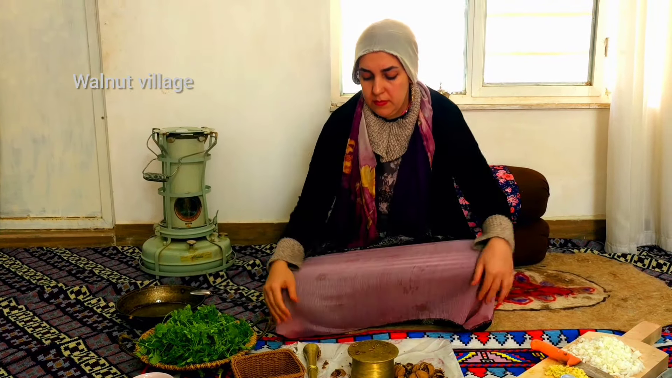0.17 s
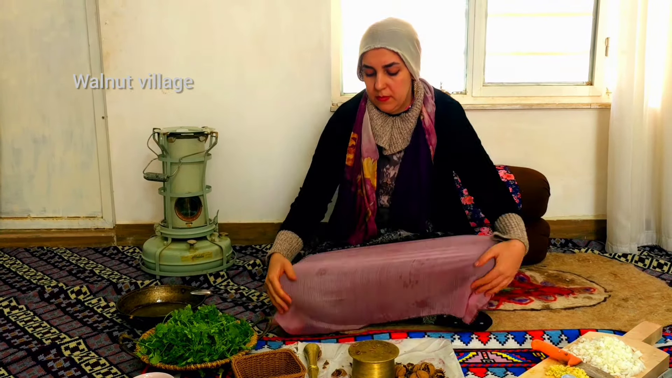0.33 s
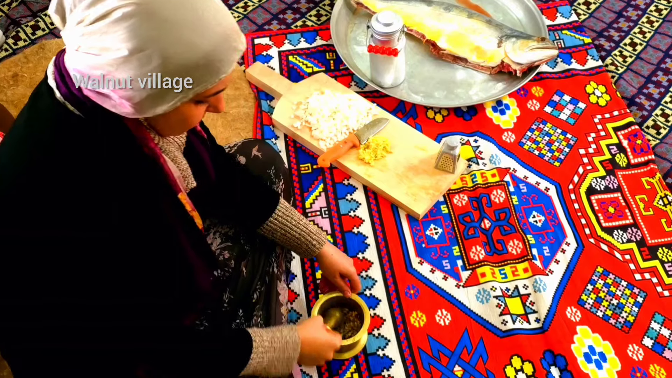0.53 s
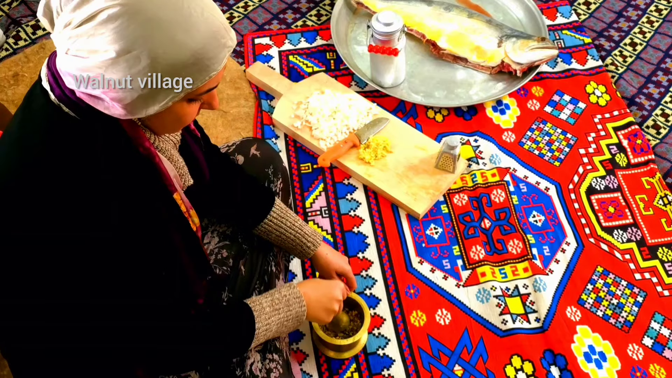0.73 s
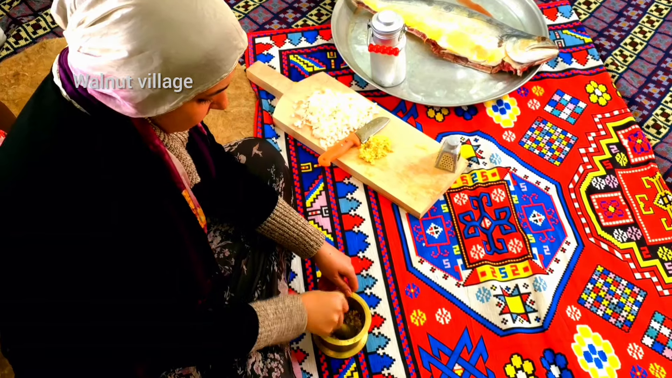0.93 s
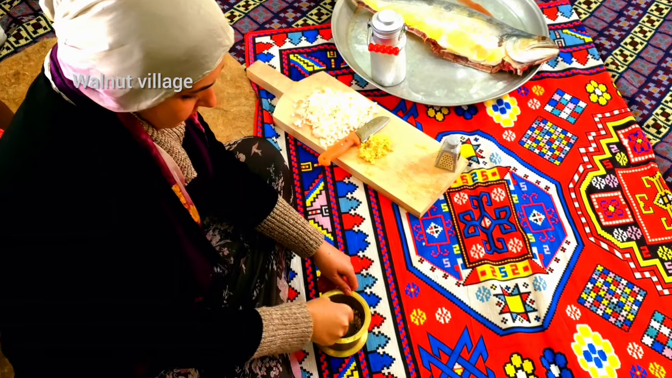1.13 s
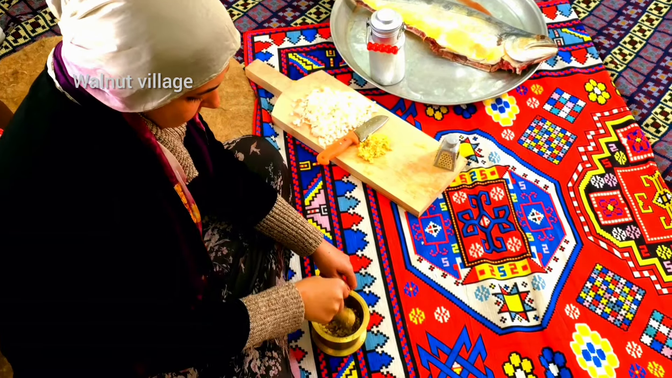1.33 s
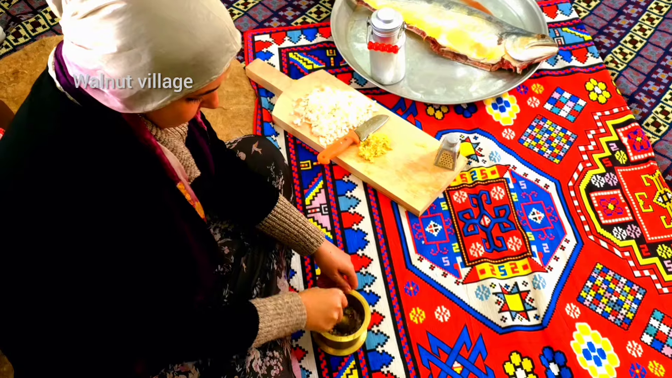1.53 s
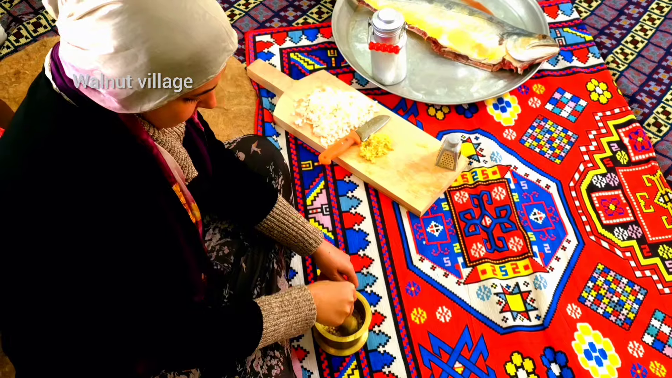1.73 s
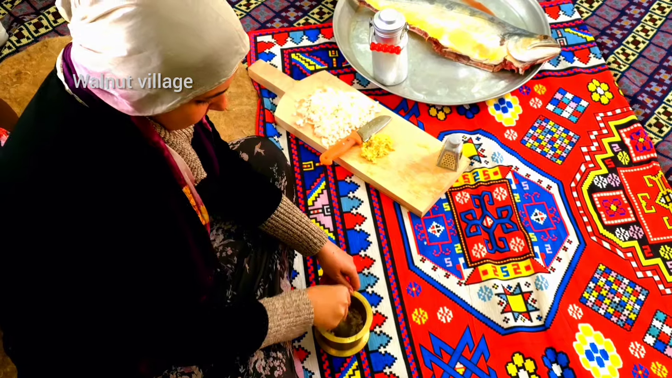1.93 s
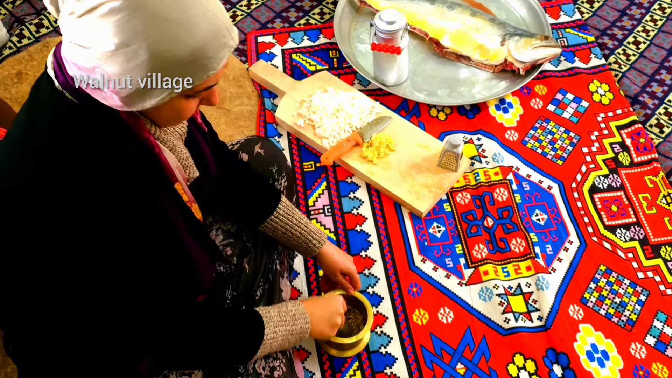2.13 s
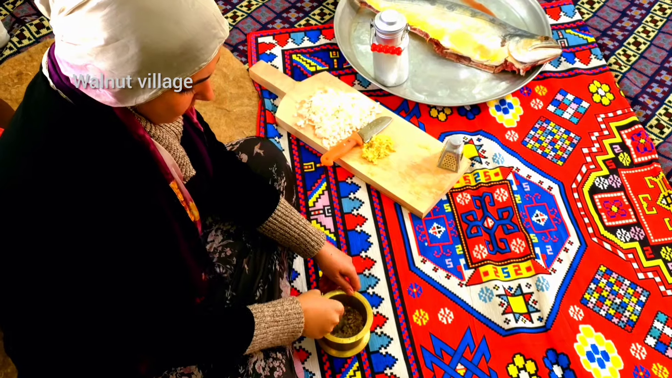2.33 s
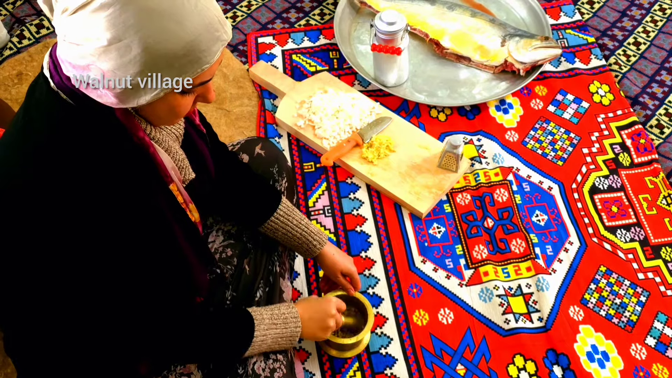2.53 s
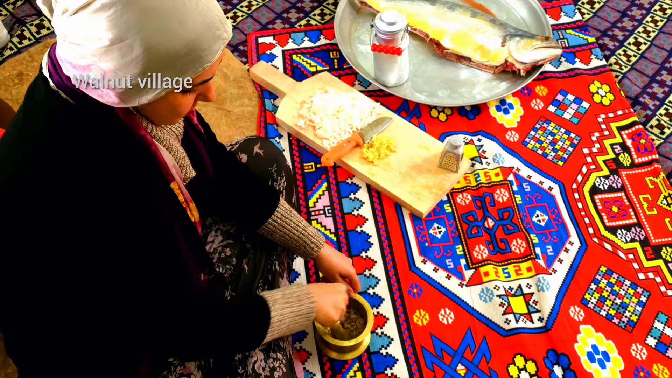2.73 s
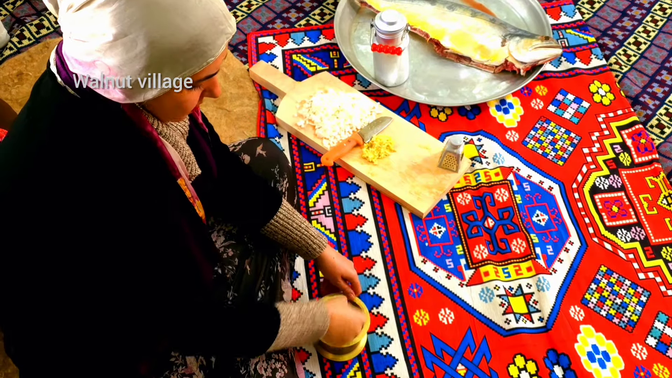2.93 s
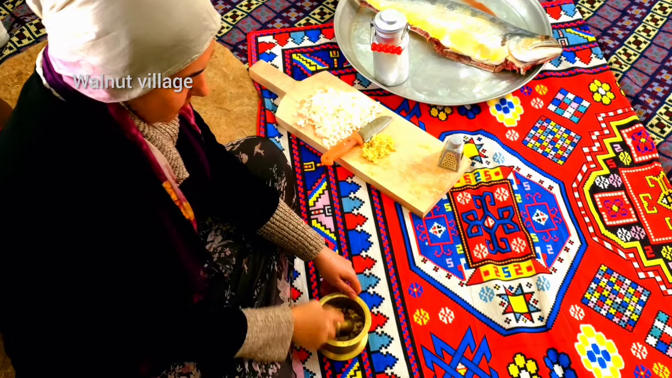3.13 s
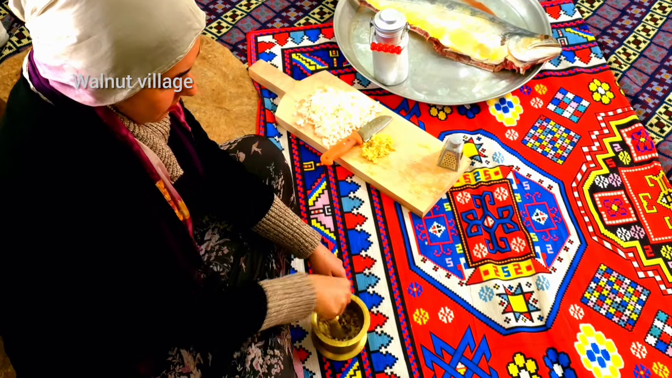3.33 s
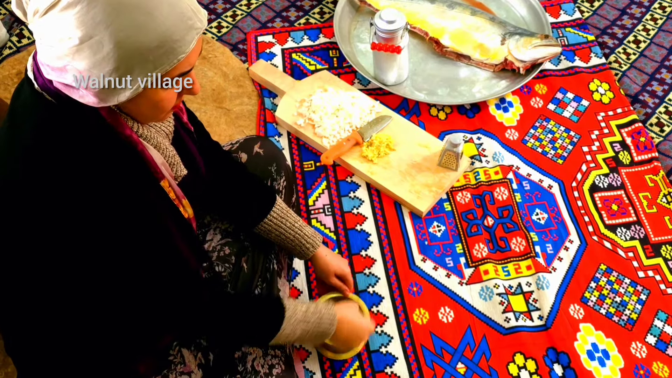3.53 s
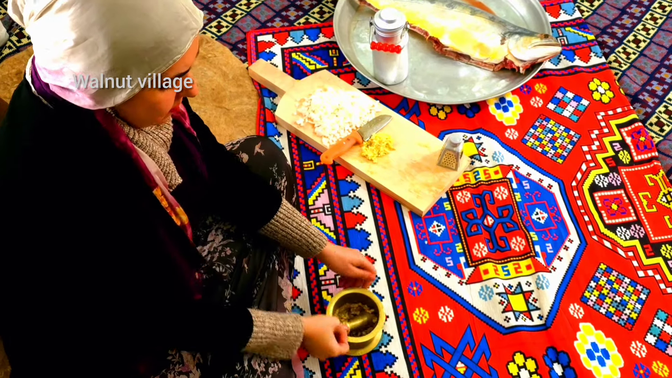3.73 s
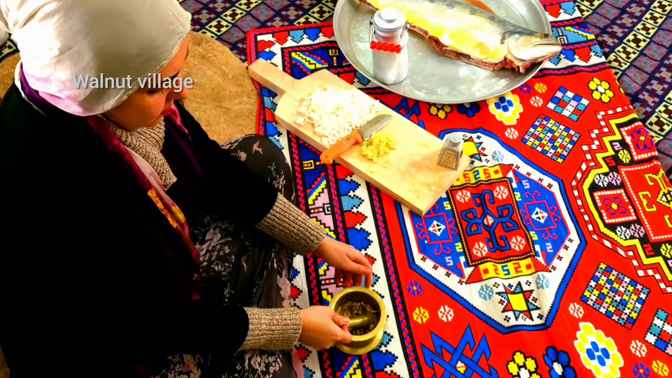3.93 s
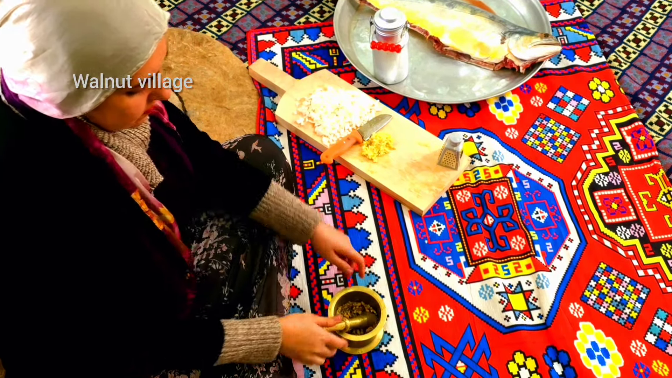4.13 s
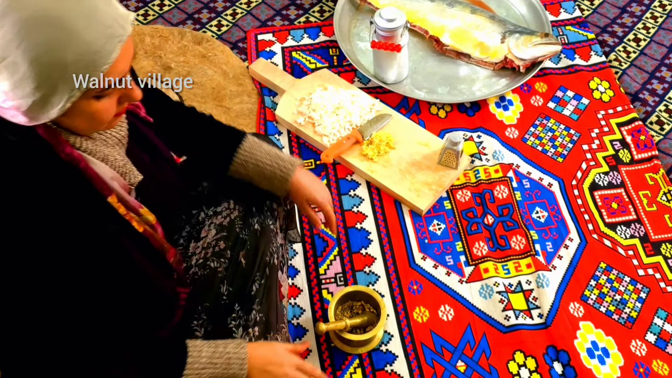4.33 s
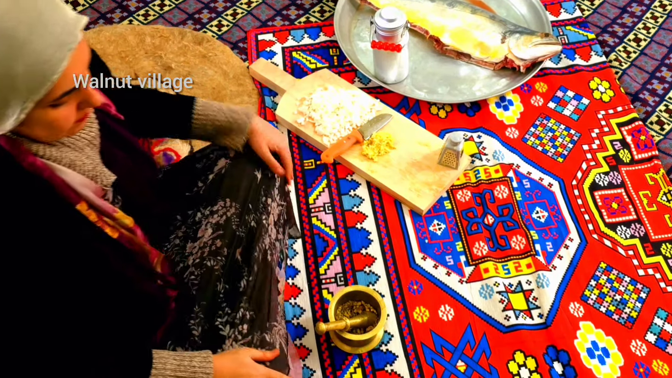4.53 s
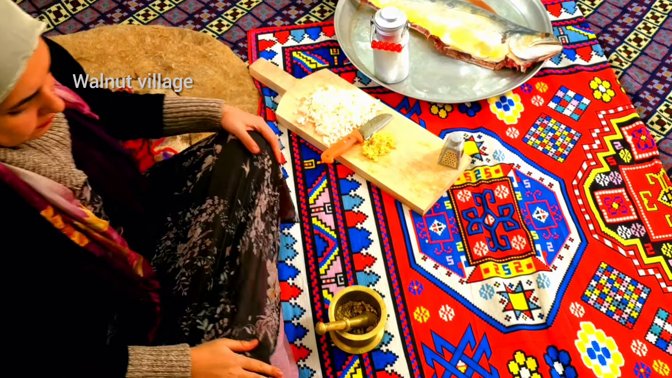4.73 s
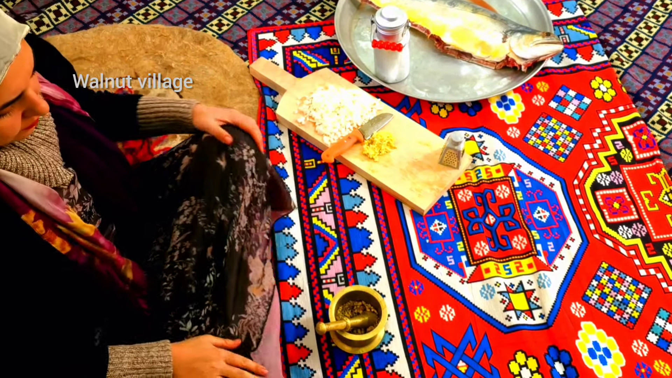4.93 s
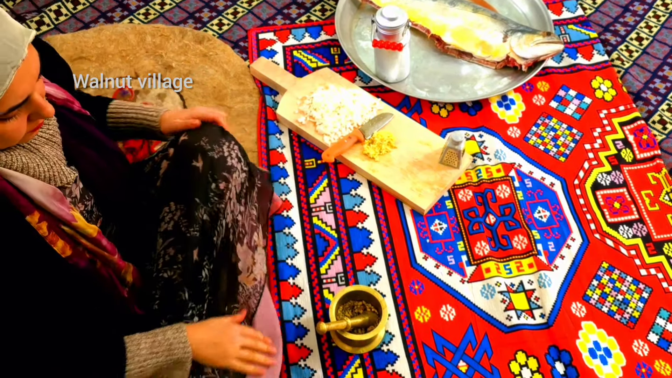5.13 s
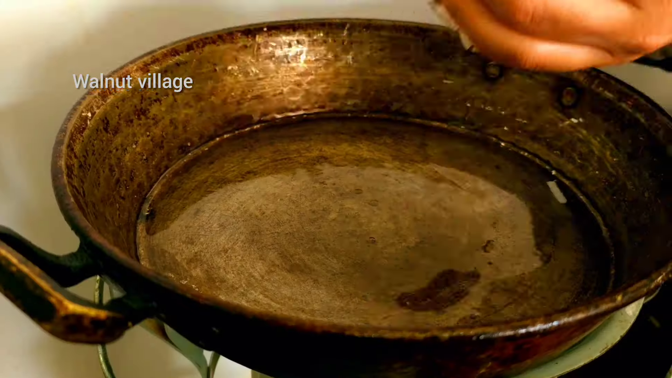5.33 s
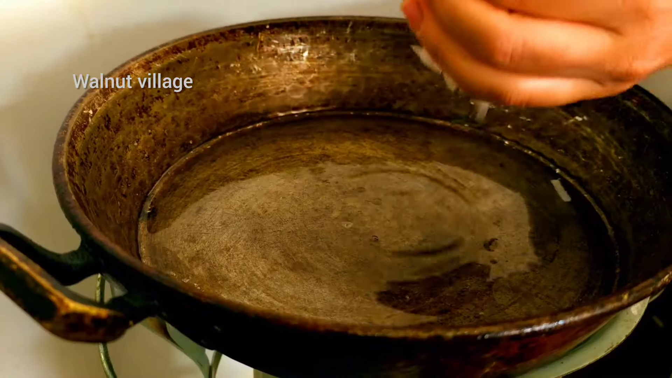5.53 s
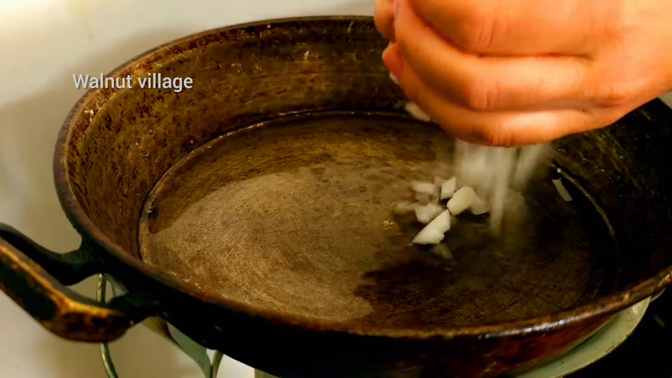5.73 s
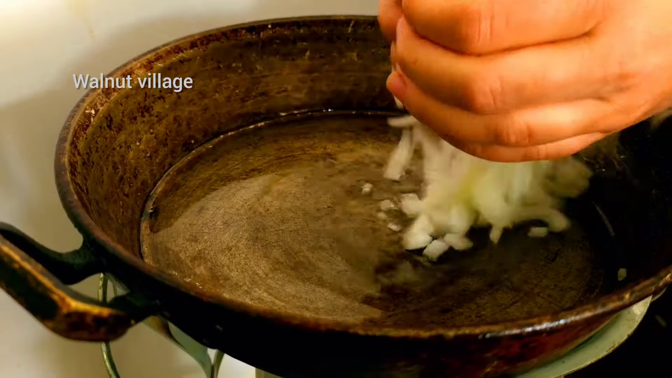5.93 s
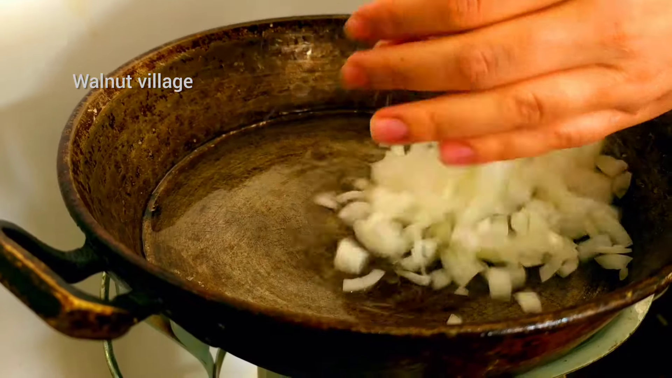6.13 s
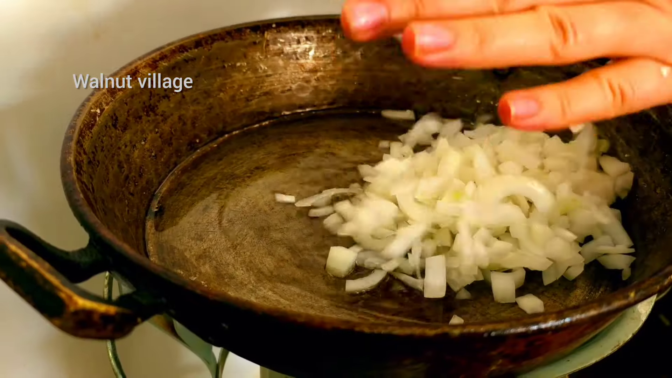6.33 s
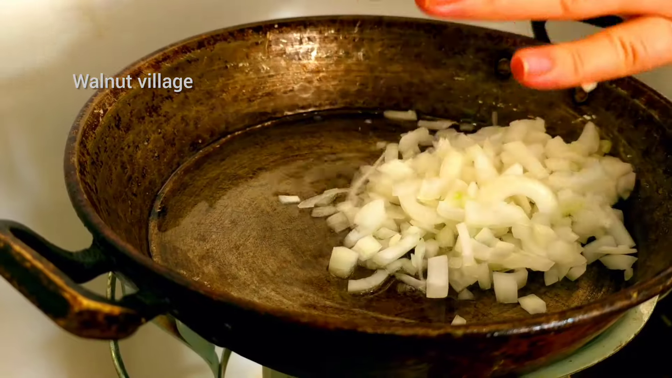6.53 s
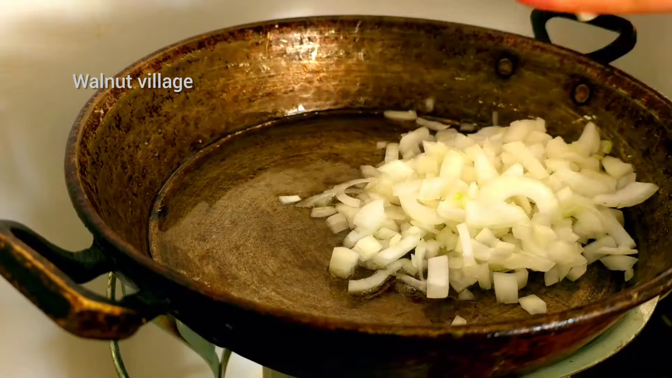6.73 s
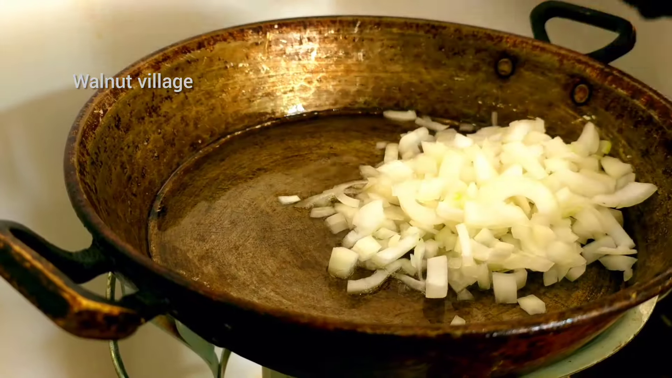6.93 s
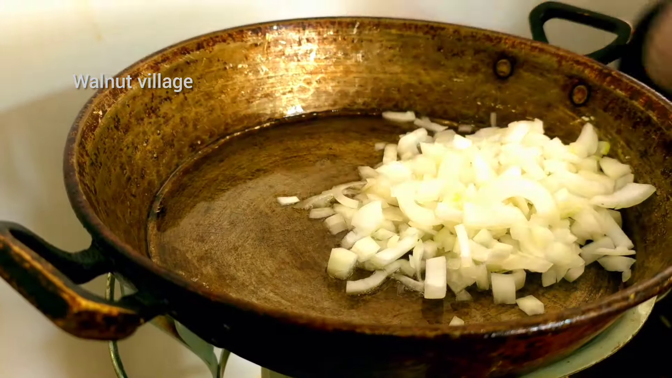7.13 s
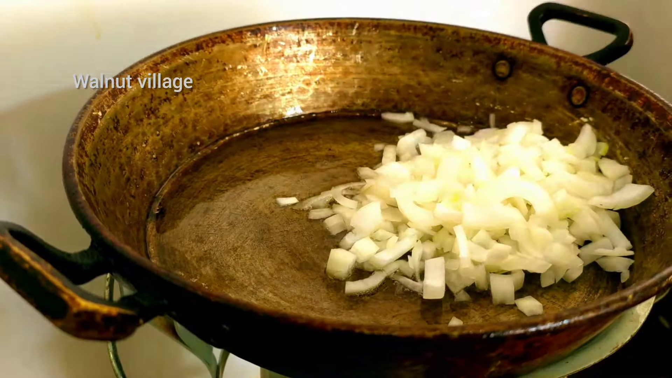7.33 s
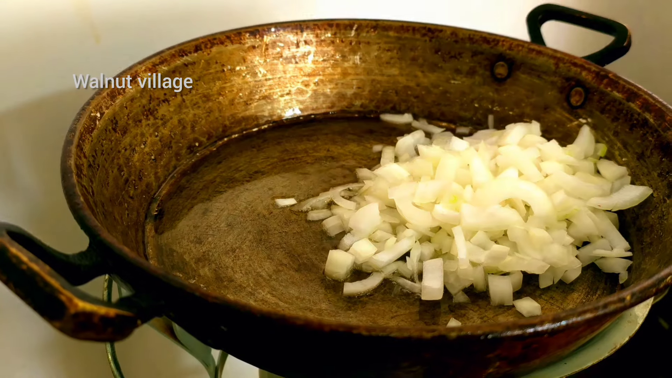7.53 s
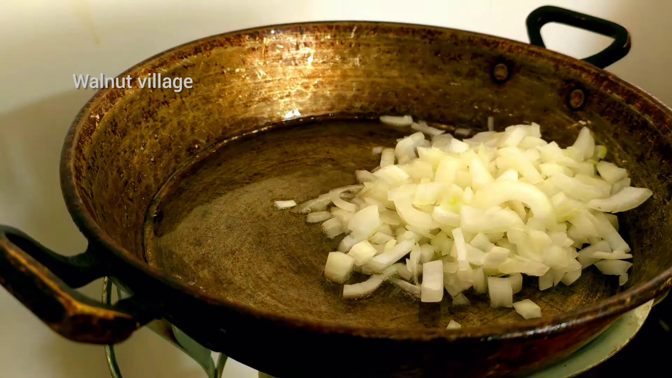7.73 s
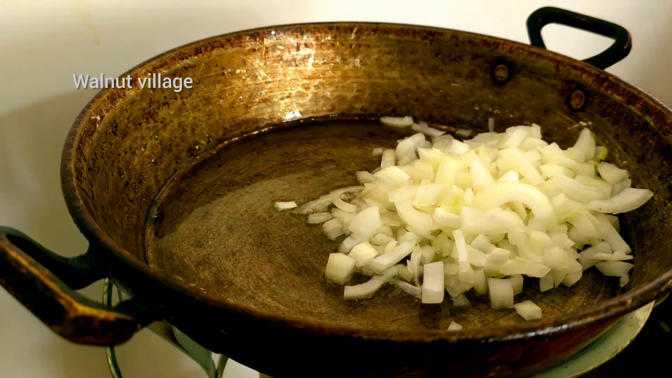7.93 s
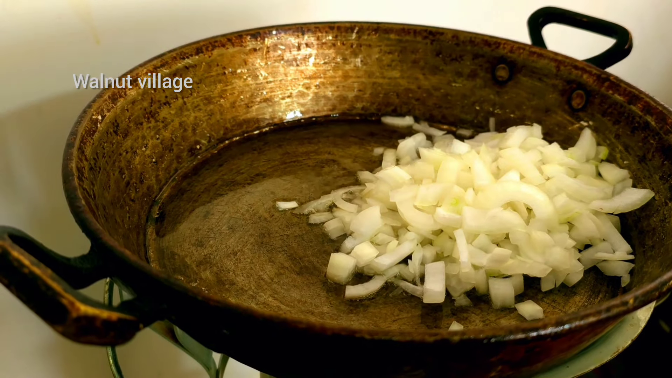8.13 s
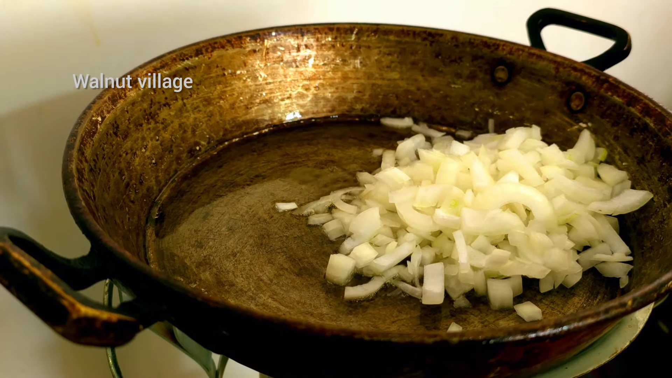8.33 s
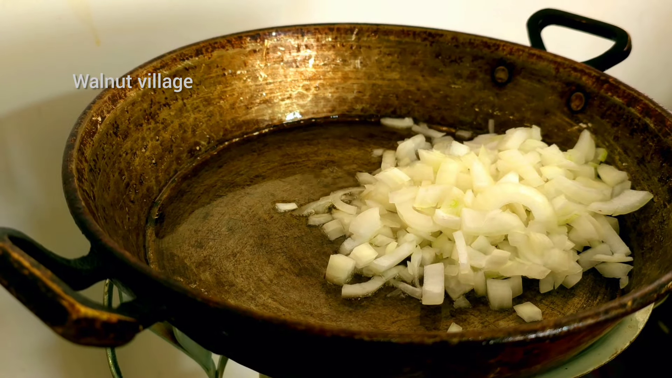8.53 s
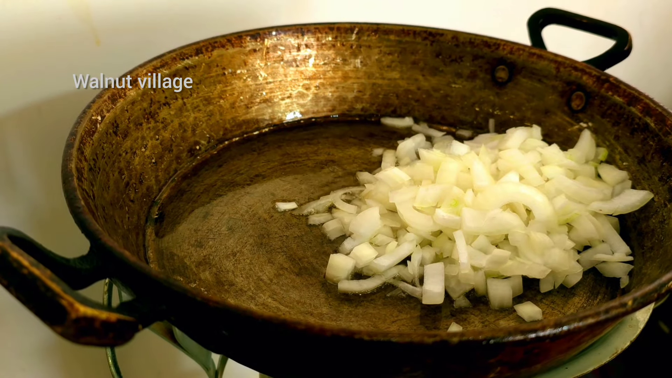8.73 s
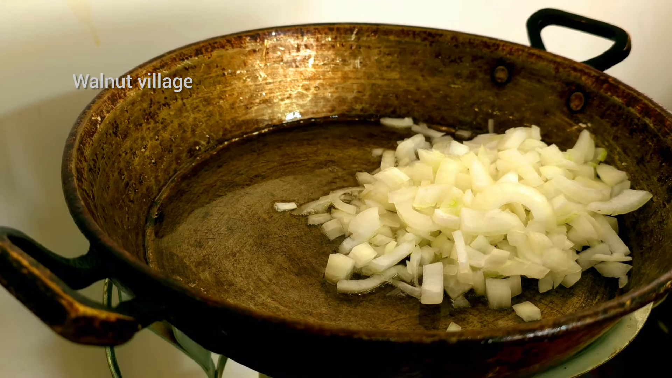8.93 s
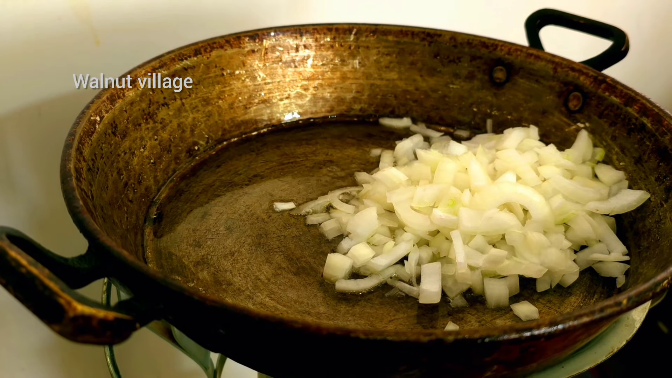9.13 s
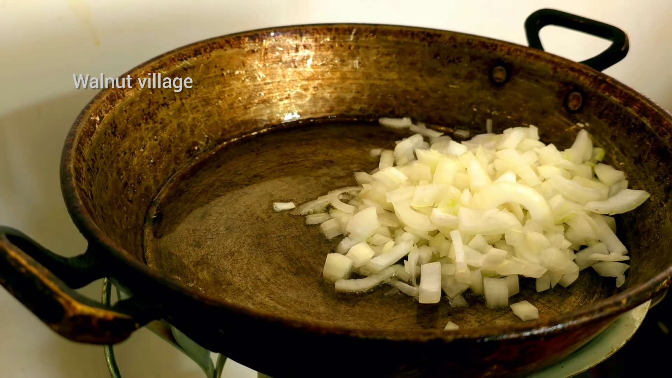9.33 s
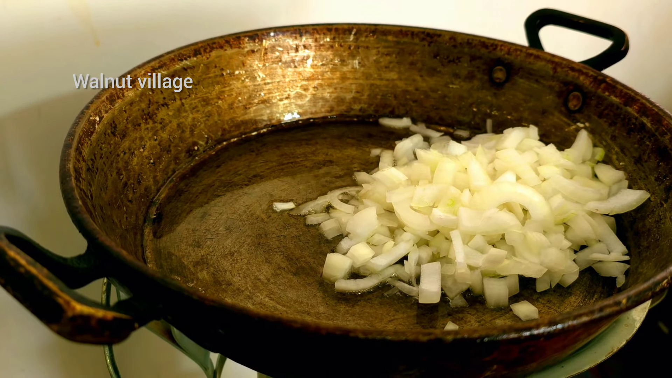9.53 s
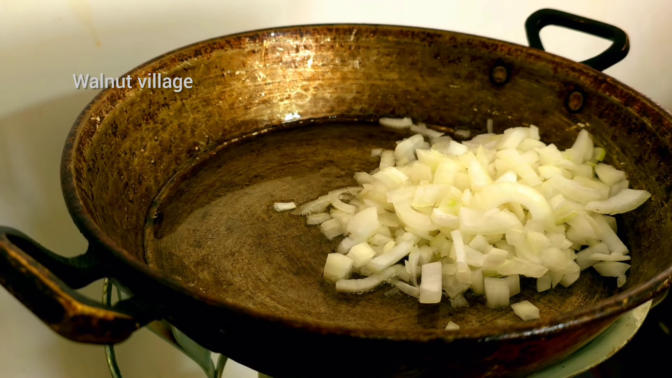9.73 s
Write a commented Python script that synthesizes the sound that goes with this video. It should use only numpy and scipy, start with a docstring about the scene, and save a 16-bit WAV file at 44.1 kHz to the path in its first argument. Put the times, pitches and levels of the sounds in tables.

```python
"""Garlic in a mortar, then onion in hot oil

In a quiet living room a brass pestle clinks on a mortar's wall, thuds into garlic and is laid down.
The brass rings as decaying, beating modes; each pound is a crunch of clicks over a booming floor.
In a kitchen a heavy pan clanks on a gas ring and chopped onion drops into hot oil. Random clicks
through filters patter, spit and settle to an even sizzle; gliding sines squeal.
Filtered noise makes the room air, the clothes, the flame and the gusts."""
import sys
import numpy as np
from scipy import signal
from scipy.fft import rfft, irfft
from scipy.io import wavfile

SR = 44100
rng = np.random.default_rng(int(sys.argv[2]) if len(sys.argv) > 2 else 0)


def int16_out(signal):
    """Quantize to a 16-bit WAV file."""
    q = np.round(np.clip(np.atleast_2d(signal).T, -1, 1) * 32767)
    wavfile.write(sys.argv[1], SR, q.astype(np.int16))


N = 435246
T = np.arange(N) / SR
AGE = T[:SR]   # time since an onset
SIDES = np.array([[1], [-1]])   # left, right


def from_db(db):
    """Amplitude of a level in dB."""
    return 10 ** (np.asarray(db) / 20)


def add(track, s, sound):
    """Mix a sound into a track from time s on."""
    at = round(s * SR)
    track[..., at:at + sound.shape[-1]] += sound[..., :N - at]


def together(*levels):
    """Level of unrelated sounds heard at once: their powers add."""
    return np.sqrt(sum(level ** 2 for level in levels))


def rms_one(x):
    """Scale so that the middle of the channels has rms 1."""
    return x / np.sqrt(np.mean(np.atleast_2d(x).mean(0) ** 2) + 1e-20)


def colour(x, spectrum, size=8192):
    """Causal (minimum-phase) filter that follows (Hz, dB) points and falls away beyond them."""
    hz, db = np.transpose(spectrum)
    octave = np.log2(np.maximum(np.fft.rfftfreq(size, 1 / SR), 1))
    points = np.log2(hz)
    beyond = np.abs(octave - np.clip(octave, points[0], points[-1]))
    shape_db = np.interp(octave, points, db) - np.minimum(30 * beyond, 70)
    # folding the cepstrum gives minimum phase
    cepstrum = irfft(np.log(from_db(shape_db)))[:size // 2]
    cepstrum[1:] *= 2
    response = irfft(np.exp(rfft(cepstrum, size)))
    filtered = signal.oaconvolve(np.atleast_2d(x), response[None], axes=1)
    return filtered[:, :x.shape[-1]].reshape(x.shape)


def drift(rate, t=T):
    """Slow chance: normal knots, rate per second, joined by lines."""
    knots = rng.standard_normal(int(t[-1] * rate) + 2)
    return np.interp(t * rate, np.arange(len(knots)), knots)


def noise(spectrum, side_db):
    """Coloured stereo noise, rms 1 in the middle."""
    mid, side = rng.standard_normal((2, N))
    return rms_one(colour(mid + from_db(side_db) * side * SIDES, spectrum))


def swell(s, rise_s, fall_s):
    """A rounded rise to 1 at time s and a rounded fall."""
    width_s = np.where(T < s, rise_s, fall_s)
    return np.exp(-np.minimum(((T - s) / width_s) ** 2, 40))


def envelope(s, attack_s, hold_s, fall_db_per_s):
    """Rise from time s; from hold_s after s on, die away."""
    fall_db = np.clip(fall_db_per_s * (T - s - hold_s), 0, 200)
    return np.clip((T - s) / attack_s, 0, 1) * from_db(-fall_db)


def mode(hz, t60, phase=0):
    """One decaying partial."""
    return np.sin(2 * np.pi * hz * AGE + phase) * from_db(-60 * AGE / t60)


def contact(t60, grit):
    """A click followed by a short gritty crush; energy 1."""
    burst = grit * rng.standard_normal(SR) * from_db(-60 * AGE / t60)
    burst[0] += 1
    return burst / np.linalg.norm(burst)


def rattle(length_s, per_s):
    """A first click and a run of smaller ones at uneven moments, 20 dB down after length_s; energy 1."""
    happens = rng.random(SR) < per_s / SR
    clicks = rng.standard_normal(SR) * happens * from_db(-20 * AGE / length_s)
    clicks[0] = 2
    return clicks / np.linalg.norm(clicks)


def grains(per_s, spread_db):
    """Clicks at random moments, mostly small and a few large."""
    sizes = from_db(spread_db * np.minimum(rng.exponential(1, N), 5)) * rng.choice([-1, 1], N)
    return sizes * (rng.random(N) < per_s / SR)


def crackle(per_s, spread_db, shared, spectrum):
    """Bursts all over the pan: some reach both sides alike, the rest mainly one."""
    both, left, right = [grains(per_s, spread_db) for _ in range(3)]
    return rms_one(colour(shared * both + np.array([left, right]), spectrum))


def plop(hz, cycles, rise):
    """A bubble rings for some cycles, its pitch rising as it surfaces."""
    turns = hz * AGE[:SR // 20]
    glide = 1 + rise * np.minimum(turns / cycles, 2) / 2
    return np.sin(2 * np.pi * turns * glide) * from_db(-60 * turns / cycles)


def room(x, wet_db, t60, lag=1):
    """Direct sound, right side late by lag samples, plus a tail alike in the bass and shorter in the treble."""
    mid, side = rng.standard_normal((2, SR))
    side_filter = signal.butter(1, 1100, "high", fs=SR, output="sos")
    white = mid + signal.sosfilt(side_filter, side) * SIDES
    low = signal.sosfilt(signal.butter(1, 2500, fs=SR, output="sos"), white)
    bass_tail = low * from_db(-60 * AGE / t60)
    treble_tail = (white - low) * from_db(-60 * AGE / (0.62 * t60))
    tail = (bass_tail + treble_tail) * (AGE > .002)
    tail /= np.linalg.norm(tail, axis=1, keepdims=True)
    left, right = np.broadcast_to(x, (2, N))
    direct = np.array([left, np.interp(np.arange(N) - lag, np.arange(N), right)])
    return direct + from_db(wet_db) * signal.oaconvolve(direct, tail, axes=1)[:, :N]


# living room air spectrum: f/Hz, level/dB
AIR_SPECTRUM = [(30, -19), (100, -11), (185, 1), (260, 0.5), (350, -6.5), (420, -4), (520, -15),
                (1000, -36)]
# cloth swish spectrum: f/Hz, level/dB
SWISH_SPECTRUM = [(600, -16), (1500, -1.5), (2200, 1), (3500, -10), (6000, -19.5)]
# fine cloth rustle spectrum: f/Hz, level/dB
RUSTLE_SPECTRUM = [(2000, -3.5), (4500, 4.5), (7200, 2), (10000, -6), (12500, 1), (15500, -4)]
# sleeve and skirt movements: t at the fastest/s, length/s, swish level/dB, rustle level/dB
CLOTH_MOVES = [(0.023, 0.24, -66.5, -100), (0.256, 0.38, -91, -72.5), (2.585, 1, -75, -74.5),
               (4.258, 0.27, -66.5, -84), (4.502, 0.3, -80, -69.5), (5.03, 0.44, -81.5, -67)]
AIR_DB, HUM_HZ, HUM_DB = -68, 410, -68
MOVE_RISE_SHARE = 0.27   # a movement starts faster than it ends
STILL_SWISH_DB, STILL_RUSTLE_DB = -84.5, -83   # faint hiss between movements


def living_room():
    """Steady noise for the air with a faint sine hum; cloth noise follows the speed of each movement."""
    swish, rustle = from_db(STILL_SWISH_DB), from_db(STILL_RUSTLE_DB)
    for s, length, swish_db, rustle_db in CLOTH_MOVES:
        speed = swell(s, MOVE_RISE_SHARE * length, length)
        swish = together(swish, from_db(swish_db) * speed)
        rustle = together(rustle, from_db(rustle_db) * speed)
    air = from_db(AIR_DB) * noise(AIR_SPECTRUM, side_db=-7.5)
    hum = from_db(HUM_DB) * np.sin(2 * np.pi * HUM_HZ * T)
    clothes = swish * noise(SWISH_SPECTRUM, side_db=-0.5) + rustle * noise(RUSTLE_SPECTRUM, side_db=0.5)
    return air + hum + clothes


# air buffeting spectrum: f/Hz, level/dB
BUFFET_SPECTRUM = [(14, 10), (22, 20.5), (29, 13), (38, 1), (50, 11), (70, -14)]
# flame flutter spectrum: f/Hz, level/dB
FLAME_SPECTRUM = [(40, -71), (70, 9), (105, 10), (135, -7), (200, -50)]
# burner drone spectrum: f/Hz, level/dB
BURNER_SPECTRUM = [(150, -40), (195, 1), (230, -16.5), (255, 12), (280, -1.5), (320, 1.5), (450, -8),
                   (700, -11.5)]
# air pushed at the microphone by the hand: t at the peak/s, level/dB
HAND_GUSTS = [(6.07, -67), (6.41, -31.5)]
# flutter of the gas flame: t/s, level/dB
FLAME_FLUTTER = [(7.0, -68.5), (7.59, -65.5), (7.82, -81), (7.97, -67), (8.21, -96), (8.63, -63),
                 (9.84, -76.5)]
GUST_ATTACK_S, GUST_FALL_DB_PER_S = 0.089, 66
GUST_FLUTTER_DB = -12.5   # higher flutter that comes with a gust, against the gust
LANDING_THUD_DB = -56.5   # low thud of the onion on the iron


def stove(landing):
    """Flame noise flutters over the burner's drone; onion thuds, and the withdrawing hand's air buffets."""
    flame_db = np.interp(T, *np.transpose(FLAME_FLUTTER))
    gust = 0
    for s, db in HAND_GUSTS:
        gust = gust + from_db(db) * envelope(s - GUST_ATTACK_S, GUST_ATTACK_S, GUST_ATTACK_S, GUST_FALL_DB_PER_S)
    flutter = together(from_db(flame_db), from_db(LANDING_THUD_DB) * landing,
                       from_db(GUST_FLUTTER_DB) * gust)
    buffeting = gust * noise(BUFFET_SPECTRUM, side_db=-13)
    flame = flutter * noise(FLAME_SPECTRUM, side_db=-10.0)
    return buffeting + flame + from_db(-66.0) * noise(BURNER_SPECTRUM, side_db=-7.0)


# small knocks of handling: t/s, level/dB, f/Hz
HANDLING_TAPS = [(4.478, -47, 444), (5.254, -44, 2460)]


def taps():
    """Dull little knocks: gritty contacts filtered around one pitch each."""
    out = np.zeros(N)
    for s, db, hz in HANDLING_TAPS:
        tap = colour(contact(t60=0.015, grit=0.48), [(hz / 2, -9), (hz, 0), (hz * 1.38, -8)])
        add(out, s, from_db(db) * tap / np.abs(tap).max())
    return room(out, wet_db=-4.0, t60=0.37)


# blows cushioned by garlic: t/s, relative crunch level/dB, relative floor thump level/dB
CUSHIONED_BLOWS = [(0.955, -48.5, -57.5), (1.448, -45.5, -38), (1.944, -47.5, -48.5)]
# crunch spectrum: f/Hz, level/dB
CRUNCH_SPECTRUM = [(200, 8.5), (700, -10), (1500, -12), (2300, -2.5), (3600, -2), (5500, -11.5),
                   (10000, -15), (16000, -12)]
# floorboard modes: f/Hz, relative level/dB, t60/s
FLOOR_MODES = [(62, -27.5, 0.83), (115, -7.5, 0.33), (144.3, -6.5, 0.53)]
ROCK_BACK_S, ROCK_BACK_DB = 0.14, -14.5   # after a pound the mortar settles back on the carpet


def pounding(crush_s=0.0045):
    """Cloves crunch briefly; the floor under the carpet booms, and again softly as the mortar rocks back."""
    crunch, thump = np.zeros((2, N))
    boards = sum(from_db(db) * mode(hz, t60) for hz, db, t60 in FLOOR_MODES)
    for s, crunch_db, thump_db in CUSHIONED_BLOWS:
        crunch += from_db(crunch_db) * np.exp(-np.minimum(np.abs(T - s) / crush_s, 20))
        add(thump, s, from_db(thump_db) * boards)
        rocking = colour(contact(t60=0.35, grit=0.86), [(45, -6.0), (70, -2), (170, -9.5)])
        rocking /= np.abs(rocking).max()
        add(thump, s + ROCK_BACK_S, from_db(thump_db + ROCK_BACK_DB) * rocking)
    crunch *= from_db(2.5) * rms_one(colour(grains(5000, spread_db=2.5), CRUNCH_SPECTRUM))
    boom = room(thump, wet_db=-8, t60=.5)
    return room(crunch, wet_db=-2.0, t60=0.41) + from_db(3.5) * boom


CHATTER_RAD, CHATTER_PER_S = 3.3, 76   # a pestle resting on the wall makes its ring stutter
SPLIT_HZ = 4.0   # the oval mode beats with a twin this much higher; higher modes beat faster
BLOOM_S = .07   # how slowly a ring swells as it fills the room
WAVER_DB, WAVER_PER_S = 3.5, 55   # the higher rings waver as the hand moves over the mouth


def wall_mode(hz, t60, free, late, twin=.42, twin_life=.85, twin_phase=1.4, ear_phase=.74):
    """A beating pair, one damped sooner by the carpet; it swells, wavers, and stutters under a firm hand."""
    shortness = min(hz / 3000, 1)   # short waves meet the two sides out of step, and the hand shades them
    phase = SIDES * ear_phase * shortness
    stutter = CHATTER_RAD * np.clip(1 - free, 0, 1) ** 3 * drift(CHATTER_PER_S, AGE)
    twin_hz = hz + SPLIT_HZ * np.sqrt(hz / WALL_LOBES[0][0])
    pair = mode(hz, t60 * free, phase + stutter)
    pair = pair + twin * mode(twin_hz, t60 * free * twin_life, phase - twin_phase - 2 * stutter)
    bloom = 1 - late * np.exp(-AGE / BLOOM_S)
    return pair * bloom * from_db(WAVER_DB * shortness * drift(WAVER_PER_S, AGE))


# brass on brass: t/s, relative level/dB, height on the wall (0 bottom, 1 rim),
# three-lobed mode/dB against the knock, share of the free ring time left by the hand
BRASS_BLOWS = [(.423, -29.5, 0.57, -14.5, .6), (0.4344, -26.5, 0.37, -11.5, .48),
               (.441, -32.5, 0.42, -11.5, .7), (.448, -28, 0.095, -5, .37), (.480, -25.5, 0.39, -7, .15),
               (.527, -45, 1, -3, .42), (.5495, -27, 1, -10.5, .96), (2.419, -46, 0.69, -10, .49),
               (2.5506, -28, 0.89, -12, .78), (3.632, -23.5, 0.42, -19, .3), (3.6351, -25, .06, -13, .3),
               (3.6425, -31, 0.74, -19, .23), (3.7029, -32, 0.79, -7, .36),
               (3.716, -40.5, 0.087, -6.5, .56), (3.9548, -32.5, 0.39, -3, 0.65)]
# rim flexing in two (oval), three and four lobes: f/Hz, relative level/dB, free t60/s, late-swelling share
WALL_LOBES = [(1181, -.5, .78, .45), (2971, 3, .62, .55), (4872, -1.5, .42, .85)]
# higher modes of the mortar wall: f/Hz, relative level/dB
UPPER_WALL_MODES = [(5778, -4.5), (6092, -4), (6917, -4), (7260, 0), (9145, -11), (9413, -14), (9800, -14),
                    (10140, -13), (11130, -15), (11950, -13), (13350, -13), (14950, -12)]
# pestle modes, damped by the fist: f/Hz, relative level/dB
PESTLE_MODES = [(1018, -13), (1500, -6), (1740, -13), (1850, -9), (1922, -8), (2080, -6.5)]
# dead knock spectrum of each contact: f/Hz, level/dB
KNOCK_SPECTRUM = [(80, -32.5), (150, -1), (300, -1), (500, -5), (950, -6.5), (1900, -2.5), (2600, -12),
                  (3750, -8), (4450, -23), (5200, -21), (6100, -11), (7400, -18), (8400, -30.5),
                  (9500, -15), (10900, -28), (12000, -16.5), (13900, -27), (15000, -21.5)]
# levels against the knock: a blow at the bottom rings the pestle, one at the rim the mortar's oval mode
OVAL_AT_BOTTOM_DB, OVAL_AT_RIM_DB = -27.5, 8
PESTLE_AT_BOTTOM_DB, PESTLE_AT_RIM_DB = 1.5, -30.5
BENDING_HZ, BENDING_AT_BOTTOM_DB, BENDING_AT_RIM_DB = 3612, 6, -48   # the pestle's bright bending mode
FOUR_LOBED_FOLLOWS, FOUR_LOBED_DB = .6, -10.5   # dB per dB of the oval mode; offset
UPPER_WALL_DB, GRIP_LOSS_DB = -4, 17.5   # higher wall modes; how much a firm grip takes from them
WALL_RING_CYCLES, WALL_BLOOM_SHARE = 2000, .3   # higher modes: t60 when free; late share
PESTLE_T60_S = .12
RIM_CUT_HZ = 1200   # a knock at the rim lacks the bass of one at the bottom


def mortar(ear_phase=0.74, scatter_db=2):
    """Each blow grates briefly and rings pestle and wall modes, balanced by its height on the wall."""
    knocks, (ring, chime, clink) = np.zeros(N), np.zeros((3, 2, N))
    for s, knock_db, height, three_lobed_db, free in BRASS_BLOWS:
        oval_db = OVAL_AT_BOTTOM_DB + height * (OVAL_AT_RIM_DB - OVAL_AT_BOTTOM_DB)
        pestle_db = PESTLE_AT_BOTTOM_DB + height * (PESTLE_AT_RIM_DB - PESTLE_AT_BOTTOM_DB)
        bending_db = BENDING_AT_BOTTOM_DB + height * (BENDING_AT_RIM_DB - BENDING_AT_BOTTOM_DB)
        four_lobed_db = FOUR_LOBED_DB + FOUR_LOBED_FOLLOWS * oval_db

        thin = signal.butter(1, 10 + RIM_CUT_HZ * height ** 2, "high", fs=SR, output="sos")
        grating = signal.sosfilt(thin, rattle(length_s=0.008, per_s=2500))
        add(knocks, s, from_db(knock_db + 31) * grating)

        lobes_db = (oval_db, three_lobed_db, four_lobed_db)
        for (hz, db, t60, late), excited_db in zip(WALL_LOBES, lobes_db):
            add(ring, s, from_db(knock_db + excited_db + db) * wall_mode(hz, t60, free, late))

        upper_db = knock_db + UPPER_WALL_DB - GRIP_LOSS_DB * (1 - free)
        for hz, db in UPPER_WALL_MODES:
            partial = wall_mode(hz, WALL_RING_CYCLES / hz, free, WALL_BLOOM_SHARE)
            add(chime, s, from_db(upper_db + db) * partial)

        for hz, db in PESTLE_MODES + [(BENDING_HZ, bending_db - pestle_db)]:
            amplitude = from_db(knock_db + pestle_db + db + rng.normal(0, scatter_db))
            polarity = rng.choice([-1, 1])
            add(clink, s, amplitude * polarity * mode(hz, PESTLE_T60_S, SIDES * ear_phase))
    ring = room(ring, wet_db=-11, t60=.4, lag=0)
    chime = room(chime, wet_db=-4, t60=.3, lag=0)
    clink = room(clink, wet_db=-6, t60=.2, lag=0)
    near = room(colour(knocks, KNOCK_SPECTRUM), wet_db=-3, t60=.04)
    return room(near, wet_db=-0.5, t60=0.45) + from_db(-1.5) * ring + chime + clink


# steam squeezed out under the onion: t/s, level/dB, length/s, start f/Hz, end f/Hz
STEAM_SQUEALS = [(5.421, -34, .022, 2900, 8550), (5.456, -30.5, 0.021, 4420, 3900),
                 (6.734, -35.5, 0.029, 3680, 3950), (8.046, -30, 0.026, 3140, 5400),
                 (8.18, -34.5, 0.011, 4480, 4600), (8.277, -38.5, 0.011, 2940, 3000),
                 (8.342, -34.5, .02, 2664, 8250), (9.353, -35, 0.0094, 4740, 5600),
                 (9.423, -36, .01, 5860, 6600), (9.735, -39, 0.011, 4560, 5560)]
SQUEAL_CURVE = 2.2   # the glide starts slowly and speeds up by this power


def squeals(waver=.085):
    """Short unsteady sines that glide ever faster as the steam pocket shrinks."""
    out, wobble = np.zeros(N), 1 + waver * drift(2500)
    for s, db, length, start_hz, end_hz in STEAM_SQUEALS:
        count, at = int(length * SR), round(s * SR)
        glide = np.linspace(0, 1, count) ** SQUEAL_CURVE
        hz = start_hz * (end_hz / start_hz) ** glide * wobble[at:at + count]
        whistle = np.sin(2 * np.pi * np.cumsum(hz) / SR)
        add(out, s, from_db(db) * signal.windows.tukey(count, .5) * whistle)
    return room(out, wet_db=-6, t60=.2)


# drops of water bursting in the oil: t/s, level/dB, lowest f/Hz
WATER_POPS = [(5.689, -14.5, 900), (5.8652, -7, 1060), (5.8733, -10, 1560), (6.005, -10, 575),
              (6.052, -8.5, 690), (6.084, -8.5, 900), (6.243, -13, 2500), (6.347, -14, 5030),
              (6.3972, -14.5, 2540), (6.509, -9, 4400), (6.726, -19.5, 6000)]


def pops():
    """Single sharp cracks: bright contacts, a millisecond or two long."""
    out = np.zeros(N)
    for s, db, low_hz in WATER_POPS:
        crack = colour(contact(t60=0.0047, grit=1.0), [(low_hz / 2, -8), (low_hz, 0), (15000, -6)])
        add(out, s, from_db(db) * crack / np.abs(crack).max())
    return room(out, wet_db=-5.0, t60=0.011, lag=0.98)


# larger pockets of trapped steam sputtering out of the heap: t/s, level/dB, f/Hz
STEAM_GURGLES = [(6.122, -19.5, 1210), (6.25, -23.5, 1230), (6.415, -26.5, 1210), (6.451, -26, 1240),
                 (6.62, -32, 1360), (6.917, -30.5, 1450), (7.358, -32.5, 1290), (7.436, -37, 1400),
                 (7.612, -33.5, 1350), (7.716, -32, 1100), (8.04, -30, 1340), (8.065, -18, 6000),
                 (8.258, -33.5, 1700)]


def gurgles(cycles=18, rise=0.089, bubble_db=-8):
    """Each pocket escapes in a quick run of wet clicks, with a bubble ringing in it."""
    out = np.zeros(N)
    for s, db, hz in STEAM_GURGLES:
        splash = colour(rattle(length_s=0.051, per_s=660), [(hz / 2, -6), (hz, 0), (hz * 1.63, -6)])
        add(out, s, from_db(db) * splash / np.abs(splash).max())
        add(out, s, from_db(db + bubble_db) * plop(hz, cycles, rise))
    return room(out, wet_db=-1, t60=0.039, lag=0.46)


# clumps of onion hitting the iron: t/s, level/dB, f/Hz
ONION_SLAPS = [(5.643, -28, 575), (5.801, -28.5, 610), (5.817, -20.5, 1570), (5.835, -21, 1330),
               (5.91, -17.5, 1600), (6.006, -17, 675), (6.051, -12, 1270), (6.141, -20, 1410)]


def slaps():
    """Wet clumps land flat on the iron, each a short dull smack of filtered clicks."""
    out = np.zeros(N)
    for s, db, hz in ONION_SLAPS:
        slap = colour(rattle(length_s=0.0058, per_s=1300), [(hz / 2, -6), (hz, 0), (hz * 2, -9)])
        add(out, s, from_db(db) * slap / np.abs(slap).max())
    return room(out, wet_db=-1, t60=0.28)


# the handful of onion lands in portions: start t/s, length/s, level/dB
ONION_PORTIONS = [(5.671, 0.22, -12), (5.839, 0.22, -5.5), (6.054, 0.097, -2)]
LANDING_ATTACK_S, LANDING_RELEASE_DB_PER_S = 0.039, 47
DRYING_DB_PER_S = 7   # the water on the cut faces boils off


def onion():
    """Three levels, each up to about 1: onion landing now, water left on its faces, and the heap in the oil."""
    landing = together(*[from_db(db) * envelope(s, LANDING_ATTACK_S, length, LANDING_RELEASE_DB_PER_S)
                         for s, length, db in ONION_PORTIONS])
    arriving = landing ** 2 / np.sum(landing ** 2)
    water = signal.lfilter([1], [1, -from_db(-DRYING_DB_PER_S / SR) ** 2], arriving)
    return landing, np.sqrt(water), np.sqrt(np.cumsum(arriving))


# knocks on the pan: t/s, relative level/dB, most excited f/Hz, low thud level/dB, rattle t60/s
PAN_KNOCKS = [(5.408, -16.5, 1370, -16, 0.13), (5.589, -16.5, 1820, -11, 0.15)]
# pan modes: f/Hz, relative level/dB, t60/s
PAN_MODES = [(690, -23, .22), (1244, -25, .5), (1305, -20, .07), (1365, -19, .11), (1610, -27, .08),
             (1738, -20, .12), (2004, -26, .09), (2960, -29, .16), (3612, -26, .14), (4520, -24, .14),
             (5170, -26, .11)]


def pan_clanks(favour_db=12, favour_octaves=0.17, knock_db=15):
    """The spot that is struck favours the modes near one pitch; the pan rattles briefly on its grate."""
    out = np.zeros(N)
    for s, db, centre_hz, thud_db, rattle_s in PAN_KNOCKS:
        ring = np.zeros(SR)
        for hz, level_db, t60 in PAN_MODES:
            nearness = np.exp(-(np.log2(hz / centre_hz) / favour_octaves) ** 2)
            ring += from_db(level_db + favour_db * nearness) * mode(hz, t60)
        spectrum = [(60, thud_db), (centre_hz / 2, thud_db), (centre_hz, 2),
                    (2600, -11), (5000, -7), (8000, -17), (15000, -20)]
        grate = colour(contact(t60=rattle_s, grit=0.72), spectrum)
        add(out, s, from_db(db) * (ring + from_db(knock_db) * grate))
    return room(out, wet_db=-0.5, t60=0.29, lag=0.97)


# patter spectrum: f/Hz, level/dB
PATTER_SPECTRUM = [(130, -38), (180, -16), (310, -4.5), (450, -10), (660, 0), (830, -2.5), (1100, -3),
                   (1380, 9), (1750, -7.5), (2100, 1.5), (3200, -25)]
# sizzle spectrum: f/Hz, level/dB
SIZZLE_SPECTRUM = [(1500, -9), (2000, -3.5), (2700, -1.5), (2950, 2.5), (4600, 4), (6500, -1), (9500, -5),
                   (11000, -15.5)]
# fine spray spectrum: f/Hz, level/dB
SPRAY_SPECTRUM = [(6500, 0), (9000, -1), (10300, 3.5), (11200, 0.5), (13000, 3), (15300, 4), (16200, -25)]
# relative levels: while onion lands, from the water on its faces, from steady frying
PATTER_DB, FRY_DB, SPRAY_DB = (-32, -44, -61), (-30.5, -37, -46.5), (-34, -40.5, -51)
LANDING_UNEVEN_DB = 3.0   # extra spread in size per unit of landing level
SPRAY_POWER = 2.4   # fine spray needs a heavy landing
SPIT_DB, SPIT_FALL_DB_PER_S = -39.5, 168   # the oil spits when the pan is knocked


def frying(landing, water, heap, clump_db=3.5, pan_ring_db=-44, bubbles_db=-5, cycles=12):
    """Wet pieces patter on the iron and bubble; countless steam pockets burst, the smallest as fine spray."""
    def level(dbs, impact):
        """Landing, surface water and steady frying add up in power."""
        return together(*[from_db(db) * cause for db, cause in zip(dbs, (impact, water, heap))])

    spit = from_db(SPIT_DB) * sum(envelope(s, 0.0065, 0, SPIT_FALL_DB_PER_S) for s, *_ in PAN_KNOCKS)

    # falling pieces differ more in size than the ticks of steady frying
    uneven_db = LANDING_UNEVEN_DB * landing
    drops = grains(1700, spread_db=3.4 + uneven_db) * from_db(clump_db * drift(45) - 2 * uneven_db)
    iron = sum(from_db(db) * mode(hz, t60) for hz, db, t60 in PAN_MODES)
    drops = drops + from_db(pan_ring_db) * signal.oaconvolve(drops, iron)[:N]
    bubbles = np.zeros(N)
    for hz in np.geomspace(600, 2600, num=14):
        bubbles += signal.oaconvolve(grains(9, spread_db=2.6), plop(hz, cycles, rise=.12))[:N]
    wet = rms_one(colour(drops, PATTER_SPECTRUM)) + from_db(bubbles_db) * rms_one(bubbles)
    patter = level(PATTER_DB, landing) * rms_one(room(wet, wet_db=-6, t60=0.32, lag=4.1))

    # slight left-right tilt plus an unsteady level
    fry = together(level(FRY_DB, landing), spit) * from_db(-.5 * SIDES + 1.26 * drift(40))
    fry = fry * crackle(7000, spread_db=4.0, shared=0.33, spectrum=SIZZLE_SPECTRUM)
    spray = together(level(SPRAY_DB, landing ** SPRAY_POWER), from_db(-12.5) * spit)
    spray = spray * from_db(0.24 * SIDES + 2.35 * drift(40))
    spray = spray * crackle(5000, spread_db=3.0, shared=0.2, spectrum=SPRAY_SPECTRUM)
    return patter + fry + spray


# moments of silence: from t/s, to t/s
SILENCES = [(.371, .419), (5.36, 5.406)]
KITCHEN_FROM_S = 5.4


def scene():
    """First the living room, then the kitchen, with two brief silences cut through everything."""
    in_kitchen = T >= KITCHEN_FROM_S
    landing, water, heap = onion()
    garlic = living_room() + pounding() + mortar()
    cooking = stove(landing) + squeals() + pops() + gurgles() + slaps()
    cooking = cooking + pan_clanks() + frying(landing, water, heap)
    sound = garlic * ~in_kitchen + taps() + cooking * in_kitchen
    silent = np.any([(T > start) & (T < end) for start, end in SILENCES], axis=0)
    return sound * ~silent


CUTOFF_HZ = 15900


def record(dry):
    """A steep elliptic low-pass cuts the top."""
    return signal.sosfilt(signal.ellip(10, .2, 80, CUTOFF_HZ, fs=SR, output="sos"), dry)


dry = scene()
out = record(dry)
int16_out(out)
```